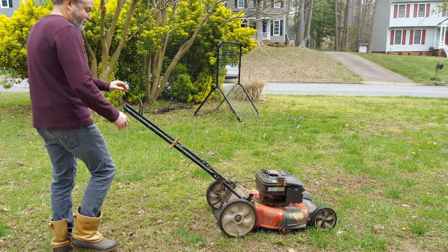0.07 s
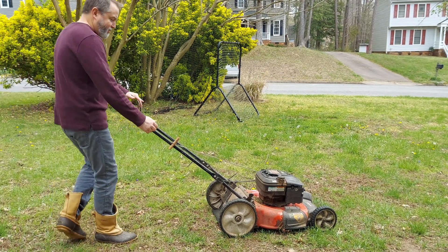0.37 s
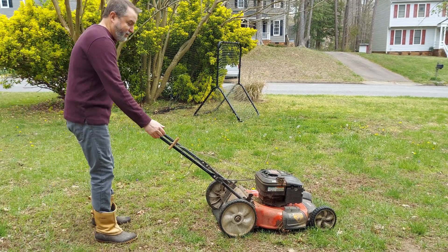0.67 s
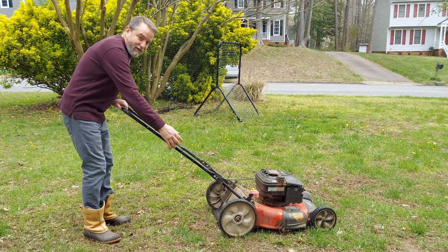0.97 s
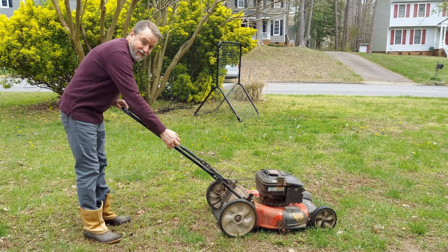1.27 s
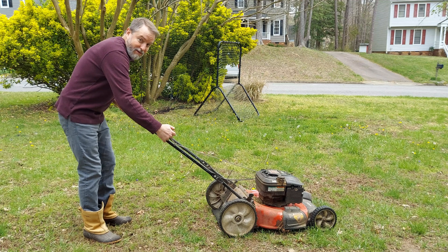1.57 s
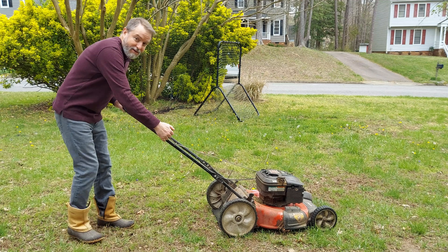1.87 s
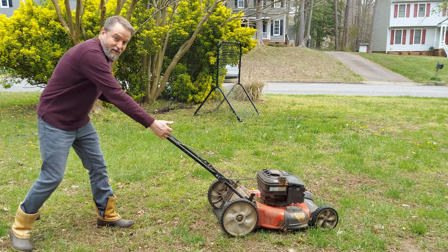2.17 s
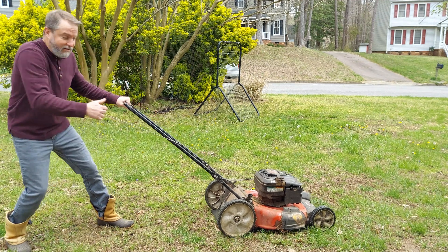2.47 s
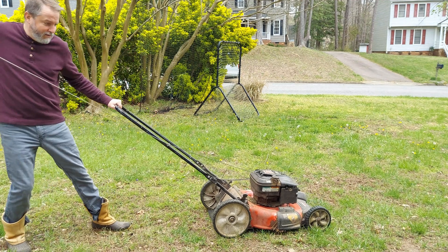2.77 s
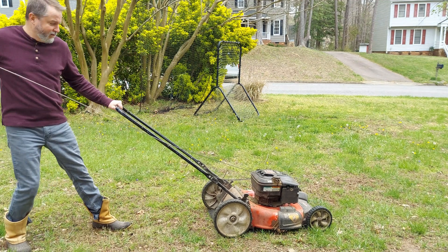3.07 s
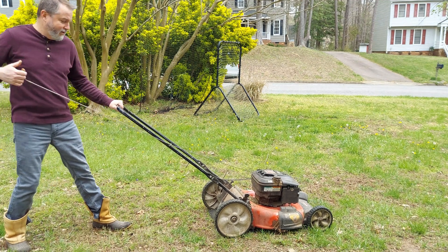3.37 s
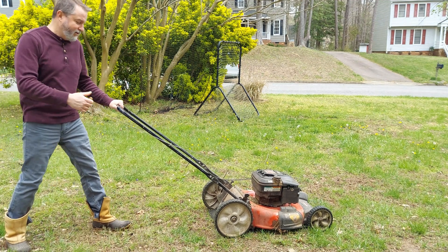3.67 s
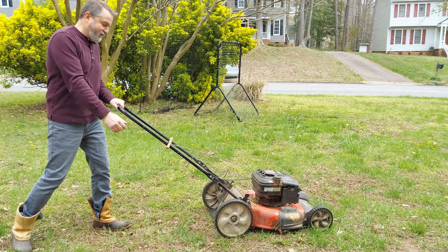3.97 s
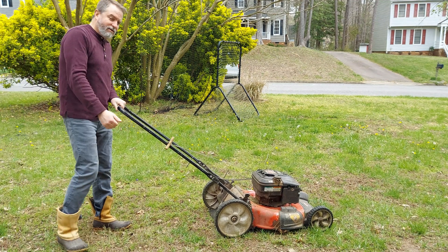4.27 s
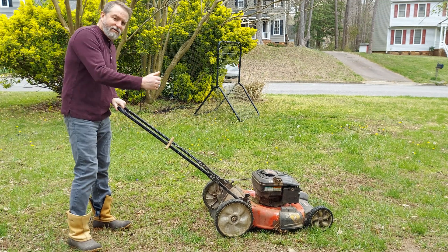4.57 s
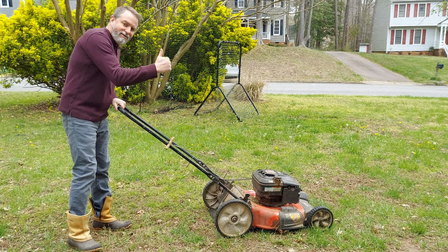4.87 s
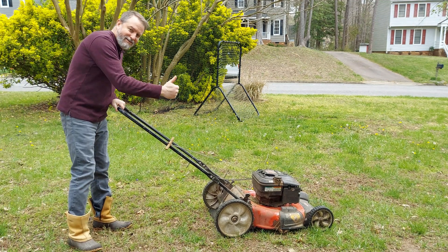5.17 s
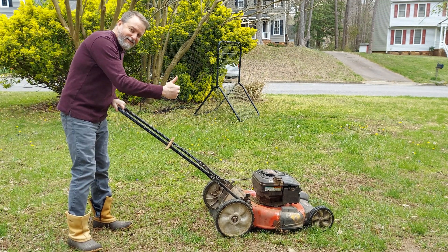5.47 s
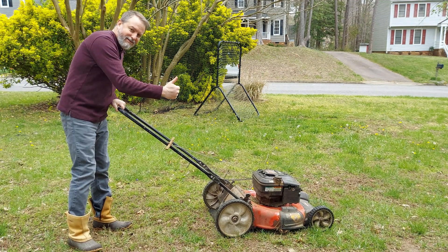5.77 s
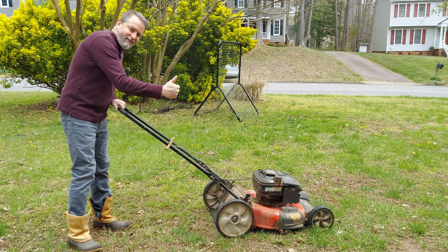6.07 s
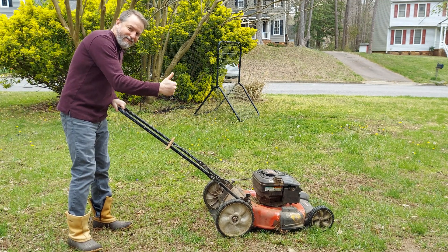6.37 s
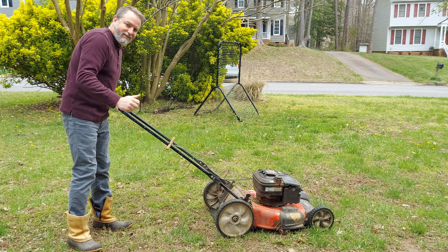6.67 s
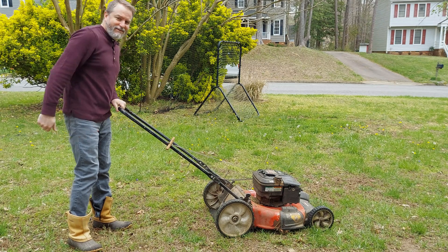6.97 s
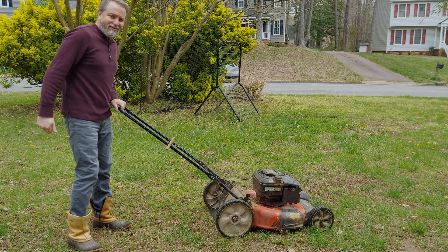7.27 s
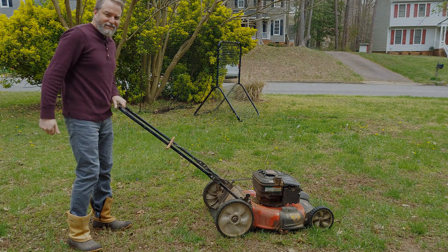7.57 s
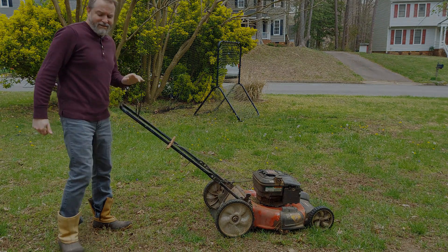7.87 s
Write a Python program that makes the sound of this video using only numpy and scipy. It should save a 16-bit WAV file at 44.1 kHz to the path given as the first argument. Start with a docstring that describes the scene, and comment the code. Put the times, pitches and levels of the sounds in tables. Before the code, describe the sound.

A push mower knocks, starts on one cord pull and runs steadily on a lawn, then is shut off and begins slowing.

```python
"""Push mower on a lawn

A few steps away, the handle is jolted and knocks. One pull on the cord spins the one-cylinder
four-stroke until it fires, and it settles at its governed speed: exhaust pulses ring the muffler,
the blade drones in the deck, piston and valves clatter. Then the ignition is cut and it starts to
coast down. Faint birds and a low neighbourhood rumble sit behind."""
import sys
import numpy as np
from scipy import signal
from scipy.fft import rfft, irfft, next_fast_len
from scipy.io import wavfile
from scipy.ndimage import uniform_filter1d

SR = 44100
rng = np.random.default_rng(int(sys.argv[2]) if len(sys.argv) > 2 else 0)


def digitize_waveform(pressure):
    """Quantize a signal to 16-bit integers and store it at the path in sys.argv[1].

    Rows of a 2-D input are taken as channels; values are limited to [-1, 1].
    """
    field = np.atleast_2d(pressure).T
    bounded = np.clip(field, -1, 1)
    quanta = np.round(bounded * 32767).astype(np.int16)
    wavfile.write(sys.argv[1], SR, quanta)


N = 353285
T = np.arange(N) / SR
RUNNING = (T > 4) & (T < 7.5)  # the steady run, where engine levels are set

# engine speed in four-stroke cycles, two shaft turns each: t/s, f/Hz
SPEED = [(2.45, 0), (2.55, 4.93), (2.82, 5.2), (3.163, 9.06), (3.44, 20.17), (3.663, 25.5), (3.978, 24.24),
         (4.09, 24.3), (4.3, 24.87), (4.45, 24.5), (4.68, 24.74), (4.936, 24.65), (5.096, 24.24),
         (5.356, 24.99), (5.685, 24.11), (5.872, 24.94), (6.119, 24.72), (7.229, 24.93), (7.62, 24.87)]
GOVERNED_HZ, DRAW_HZ, BITE_HZ = 24.8, 7.1, 10  # cruising; intake and blade fade below the other two
CATCH_S, CUT_S, COAST_S = 3.15, 7.63, 0.76  # first firing, ignition cut, coast-down time constant
SHUT_S, SHUT_TAKES_S, REOPEN_TAKES_S = 3.49, .15, 0.87  # throttle shuts near full speed, reopens coasting
# engine faders by part: base level/dB, per doubling of speed/dB, under load/dB, coasting/dB
FADERS = {"exhaust": (-26, 17.5, 11.5, 2.5), "intake": (-23, -0.5, -1.5, -1), "gulp": (-24, 0, -3.5, -5.5),
          "blade": (-18, 5.5, -2, -3), "air": (-22.5, 6, 3, 2), "deck": (-34, 2, 6.5, 3.5),
          "clatter": (-25, 7, 2.5, -3.5), "hiss": (-31.5, 5, 7.5, -2.5)}
# bark of the muffler: f/Hz, level/dB
MUFFLER_EQ = [(20, -80), (75, -20), (120, 12.5), (155, -7.5), (200, -5.5), (270, -11.5), (345, 10.5),
              (420, -7), (700, -14.5), (1200, -16), (4000, -44.5)]
# dull compression thump as the engine coasts down: f/Hz, level/dB
THUMP_EQ = [(20, -19.5), (60, -3), (160, 2.5), (260, -9.5), (550, -8), (900, -14.5), (4000, -42.5)]
# hiss of exhaust gas: f/Hz, level/dB
HISS_EQ = [(1500, 2), (4000, 1.5), (6000, 1.5), (7700, 1.5), (8800, -4), (9900, -8), (11000, -3.5),
           (12000, -0.5), (15500, -3.5)]
# bright rings of the muffler shell: f/Hz, width/Hz, lift/dB
SHELL_PEAKS = [(3400, 900, 10), (7700, 500, 14)]
# air box rung by the intake stroke: f/Hz, level/dB
AIR_BOX_EQ = [(12, -62.5), (40, -18), (72, -31), (98, -3), (124, 7.5), (150, 6.5), (174, 2.5), (222, 4.5),
              (250, -1.5), (272, -13.5), (335, -3.5), (390, -21), (470, -18), (800, -31.5), (3000, -44.5)]
# deep gulp of an open throttle: f/Hz, level/dB
GULP_EQ = [(15, -46), (42, -9), (68, 2.5), (105, -2), (200, -23), (800, -69)]
# one blade pass at governed speed: f/Hz, level/dB
BLADE_EQ = [(30, -44.5), (99, 0), (198, -2), (297, -1.5), (396, -18), (495, -5), (594, -10), (693, -6.5),
            (792, -11.5), (900, -25.5), (1200, -17), (2000, -43.5), (5000, -62)]
# resonances of the discharge chute: f/Hz, width/Hz, lift/dB
CHUTE_PEAKS = [(175, 65, 5.5), (346, 53, 8), (492, 33, 6), (571, 38, 9)]
# air rushing under the deck: f/Hz, level/dB
DECK_AIR_EQ = [(20, -32), (54, -12.5), (90, -11), (130, -9.5), (195, -3), (265, -5), (335, -5), (430, -3),
               (520, -0.5), (640, -14), (830, -13), (1300, -16), (4000, -63)]
# hollow resonances of the deck: f/Hz, width/Hz, lift/dB
DECK_PEAKS = [(206, 50, 4), (338, 110, 4.5), (611.6, 41, -1.5)]
# clatter of piston and valve gear: f/Hz, level/dB
CLATTER_EQ = [(300, -66), (700, 1.5), (850, -4.5), (1100, 0.5), (1300, -1.5), (1600, -4), (1900, -7),
              (2200, -5.5), (2700, -10.5), (3400, -8.5), (4500, -20), (7000, -29.5)]
# ringing panels of the engine shroud: f/Hz, width/Hz, lift/dB
SHROUD_PEAKS = [(1100, 40, 4.5), (1251, 31, 5.5), (1424, 60, 2.5), (1706, 11, 7), (2060, 130, 1),
                (3310, 19, 3.5), (4140, 30, 7.5)]

# knocks of handle, cable and deck: t/s, level/dB, thud/dB, crack/dB, rattle t60/s
KNOCKS = [(0.364, -40.5, -3.5, 3, 0.24), (.711, -31.5, -5, 2, 0.034), (0.728, -34.5, 8, -28, .1),
          (.7555, -22.5, -9, -10, 0.12), (0.792, -21.5, -1.5, -13, 0.12), (0.8124, -9.5, -16, 5, 0.048),
          (0.816, -8.5, -13, -1, 0.042), (0.824, -18.5, 2, 1, 0.12), (.849, -29.5, 11.5, -3, 0.073),
          (1.831, -42.5, -8, -2.5, 0.27), (2.119, -45.5, -17, -6, 0.29), (2.205, -49, -15, 12.5, 0.09),
          (2.363, -30, -4.5, -31, 0.31), (2.624, -18, -8.5, -22, 0.12), (2.674, -18, -2.5, -18, 0.074),
          (2.789, -16, -16, -21, 0.085), (7.622, -15, -13.5, -3, 0.19)]
# kicks to the deck as the engine catches:
# from/s, to/s, place/cycles, first level/dB, slope/(dB/s), thud/dB, crack/dB, rattle t60/s
KICKS = [(3.1, 3.46, .9, -14.5, 4.5, 3, -11, 0.065)]
# modes of the steel frame: f/Hz, level/dB, t60/s
FRAME_MODES = [(171, 2, 0.22), (200, -4, 0.22), (365, -11.5, 0.13), (457, -3.5, 0.09), (586, 0, 0.095),
               (870, -11, 0.1), (1010, -7.5, 0.068), (1575, -12.5, 0.095), (1757, -13, 0.094)]
THUD_BELOW_HZ = 260
# dull rattle of a knock: f/Hz, level/dB
KNOCK_EQ = [(100, -18), (300, -4.5), (550, 3.5), (1000, -4.5), (1350, -14), (1750, -13), (2600, -34),
            (6000, -23.5), (16000, -43.5)]
# bright crack of struck parts: f/Hz, level/dB
CRACK_EQ = [(600, -14), (2000, 1), (4000, 3), (7500, 4), (10000, 1.5), (12500, 4), (16000, 0.5)]

PULL_S, PULL_TAKES_S = 2.414, 0.22  # the cord takes up the weight of the engine
ZIP_S, ZIP_LENGTH_S, ZIP_FIRST_HZ, ZIP_LAST_HZ = 2.43, .25, 563, 2194  # the cord in its guide
ZIP_DB, ZIP_SWELL_DB = -43.5, 19  # level at mid-pull, climb over each half
# starter pawls as the cord runs out and winds back: t/s, level/dB, housing rattle/dB
PAWL_TICKS = [(2.6305, -26, -12), (2.6754, -29, -7), (2.7188, -31.5, -9), (2.763, -29.5, -14),
              (2.8055, -29, 0.5), (2.856, -34, -12), (2.9079, -29, -10), (2.9416, -18, -16),
              (2.9753, -23, -18), (2.9835, -22, -10), (3.047, -26, -9), (3.064, -28.5, 0),
              (3.1005, -16, -17), (3.156, -15, -12.5)]
# the cord's grip seats, the brake lever hits its stop: t/s, level/dB, rattle/dB
STOP_CLICKS = [(3.943, -19, -3), (7.6544, -22.5, -5.5)]
# crisp top of a tick: f/Hz, level/dB
TICK_EQ = [(1500, -10), (9000, -11.5), (11500, 3.5), (16000, 4.5)]
SNAP_T60_S, RATTLE_T60_S, GROAN_LENGTH_S = 0.011, 0.11, 0.035
# rough groans near 600 Hz while the engine is pulled over: t/s, f/Hz, level/dB
GROANS = [(2.554, 570, -25), (2.659, 565, -29), (2.686, 660, -33), (2.752, 567, -39),
          (2.782, 656, -24.5), (2.84, 583, -24), (2.928, 592, -28.5), (2.954, 603, -25.5),
          (2.999, 548, -27), (3.125, 629, -23)]
# the pulley squeaks: t/s, f/Hz, level/dB, length/s
PULLEY_SQUEAKS = [(2.593, 1630, -23.5, 0.006), (2.803, 2470, -33.5, 0.051)]
# pings of the brake lever: t/s, f/Hz, level/dB, t60/s
LEVER_PINGS = [(7.617, 6600, -24, .09), (7.631, 6200, -22, .1)]
# sleeves, boots in the grass, the cord drawn taut: peak t/s, level/dB, rise/s, t60/s
RUSTLE_STROKES = [(.249, -50.5, 0.018, 0.23), (.39, -56.5, 0.035, .6), (.72, -57, .06, 0.8),
                  (.99, -51.5, 0.092, 0.71), (1.70, -54, 0.063, 0.82), (1.94, -54.5, 0.044, 0.67),
                  (2.29, -53.5, 0.043, 1.1), (2.52, -55, 0.11, 0.43)]
# rustle of cloth and grass: f/Hz, level/dB
RUSTLE_EQ = [(300, -6), (1000, -10), (2500, -19.5), (5000, -7), (8000, -6), (10000, -15), (12500, -8.5),
             (16000, -8)]

# distant songbirds: t/s, length/s, first f/Hz, last f/Hz, level/dB
BIRD_CALLS = [(0.484, 0.22, 8340, 7300, -67), (.61, .08, 2150, 1850, -74), (0.916, 0.17, 8600, 7800, -54.5),
              (1.333, 0.065, 2720, 2300, -70), (1.499, 0.56, 3110, 3066, -70.5),
              (2.246, 0.14, 7800, 7600, -59)]
# rumble of the neighbourhood: f/Hz, level/dB
RUMBLE_EQ = [(15, -55.5), (25, -30), (45, -8.5), (74, -17.5), (102, -2.5), (166, -16.5), (300, -23.5),
             (600, -35.5), (1500, -42.5), (4000, -49), (16000, -52)]
# stereo phase, left ahead of right: f/Hz, lead/rad
STEREO_LEAD = [(60, 0.2), (300, -0.09), (580, 1.01), (700, -1.73), (1300, -0.8), (1800, -0.6),
               (3000, -1.76), (4500, -2), (9000, -2.5), (15000, -8)]
# stereo balance, left over right: f/Hz, level/dB
STEREO_BALANCE = [(60, .5), (120, 2), (200, -1.5), (310, 2.5), (580, 2.5), (1290, -1), (2400, -1.4),
                  (4400, -1.5), (8100, 0), (15000, 2)]
# how alike diffuse sound is on both sides: f/Hz, likeness/(0-1)
STEREO_LIKENESS = [(60, 0.95), (200, 0.67), (400, 0.17), (700, 0.2), (1400, 0.72), (3000, 0.54),
                   (8000, 0.31), (15000, 0.16)]


def engine(speed, cycle):
    """Everything is locked to the crank: exhaust, intake a quarter cycle later, four blade passes."""
    wide_open, coasting = 1 - ramp(SHUT_S, SHUT_TAKES_S), ramp(CUT_S, .1)
    firing = wide_open * ramp(CATCH_S, .01)
    load = wide_open * ramp(CATCH_S - 0.08, 0.14)  # the strain builds over the first firings
    throttle = np.clip(wide_open + 0.081 + .5 * ramp(CUT_S, REOPEN_TAKES_S), 0, 1)
    doublings = np.log2(np.maximum(speed, 1) / GOVERNED_HZ)
    level = {part: gain_of(db + speed_db * doublings + load_db * load + coast_db * coasting)
             for part, (db, speed_db, load_db, coast_db) in FADERS.items()}
    # the gas leaves in separate spits while the engine pulls hard
    spit = np.clip(0.27 + 0.73 * firing, 0, 1)
    blowdown = 1 - spit + spit * burst(cycle + 0.0094, rise=0.014, fall=0.32)
    body = exhaust_bark(cycle, level) + intake(speed, cycle, throttle, level) + blade(speed, cycle, level)
    rattle = deck_air(cycle, level) + clatter(cycle, blowdown, level)
    hiss = exhaust_hiss(cycle, firing, blowdown, level)
    body += compression_thump(speed, cycle, coasting)
    rattle += deck_ring(speed, cycle, level)
    # a slow engine chugs: its rattle swings by up to 1 dB each way
    chug_db = np.clip(1 - speed / GOVERNED_HZ, 0, 1) * np.cos(2 * np.pi * (cycle - 0.46))
    return ramp(PULL_S, PULL_TAKES_S) ** 2 * (body + hiss + gain_of(chug_db) * rattle)


def crank():
    """Speed in cycles a second and the count of cycles; after the cut the speed dies away."""
    speed = np.interp(T, *np.transpose(SPEED))
    speed *= np.exp(-np.maximum(T - CUT_S, 0) / COAST_S)
    return speed, np.cumsum(speed) / SR


def exhaust_bark(cycle, level):
    """Each exhaust pulse rings the muffler."""
    bark = ring(-pulses(cycle + 0.023, spread_db=0.5), MUFFLER_EQ)
    return level["exhaust"] * levelled(bark)


def exhaust_hiss(cycle, firing, blowdown, level, snap_db=-23, snap_t60=.06):
    """Gas hisses out, and each hard firing snaps in the muffler's shell."""
    hiss = noise(HISS_EQ, SHROUD_PEAKS) * level["hiss"] * np.sqrt(blowdown)
    firings = firing * pulses(cycle + 0.011, spread_db=2)
    snaps = signal.oaconvolve(firings, gain_of(snap_db - 60 * T[:SR // 4] / snap_t60))[:N]
    return hiss + snaps * noise(CRACK_EQ, SHELL_PEAKS)


def compression_thump(speed, cycle, coasting):
    """A dull compression thump, once a cycle, softening as the engine coasts down."""
    thump = ring(pulses(cycle - .21, spread_db=2.5), THUMP_EQ)
    return gain_of(-5.5) * coasting * speed / GOVERNED_HZ * thump / abs(thump).max()


def intake(speed, cycle, throttle, level):
    """The intake stroke rings the air box; an open throttle adds a deep gulp."""
    stroke, draw = cycle - 1 / 4, np.clip(speed / DRAW_HZ, 0, 1) ** 3
    puff = levelled(ring(pulses(stroke + 0.031, spread_db=0.1), AIR_BOX_EQ))
    gulp = levelled(ring(pulses(stroke + 0.048, spread_db=3.5), GULP_EQ))
    return draw * (level["intake"] * puff + level["gulp"] * throttle * gulp)


def blade(speed, cycle, level):
    """The blade tips drone past the chute, on a shaft slightly out of balance."""
    shake = gain_of(-15.5) * speed / GOVERNED_HZ * np.sin(2 * np.pi * 2 * cycle)
    turbulence = 0.0069 * wander(hz=29.4)  # shifts each pass a little
    passes = ring(pulses(4 * GOVERNED_HZ * T + 0.068 + turbulence, spread_db=0), BLADE_EQ)
    stretched = np.interp(cycle / GOVERNED_HZ, T, passes)  # the whole wave stretches as the blade slows
    drone = levelled(lifted(stretched, CHUTE_PEAKS))
    bite = np.clip(speed / BITE_HZ, 0, 1) ** 3
    return level["blade"] * (shake + bite * drone)


def deck_air(cycle, level):
    """Air rushes through the hollow deck, fluttering with each blade pass."""
    flutter = np.sqrt(.75 + .25 * burst(4 * cycle, rise=.1, fall=.4))
    return noise(DECK_AIR_EQ, DECK_PEAKS) * level["air"] * flutter


def deck_ring(speed, cycle, level, q=10.9):
    """The shaking engine keeps the steel deck humming; a slow blade shakes it pass by pass."""
    shaking, hum = rng.standard_normal(N), np.zeros(N)
    depth = np.clip(.85 * (1.25 - speed / GOVERNED_HZ), 0, 1)
    shaking *= 1 - depth + depth * burst(4 * cycle - 0.056, rise=.05, fall=0.22)
    for hz, _, lift in DECK_PEAKS:
        peak = signal.iirpeak(hz, q, fs=SR)
        hum += gain_of(lift) * signal.lfilter(*peak, signal.lfilter(*peak, shaking))
    return level["deck"] * hum / rms(hum)


def clatter(cycle, blowdown, level):
    """Piston and valve gear slap unevenly each half turn; each exhaust spit shakes the shroud too."""
    slaps = burst(4 * cycle - .2, rise=0.05, fall=0.51) * gain_of(5.34 * wander(hz=60))
    envelope = np.sqrt(1.08 + 0.27 * slaps) * blowdown ** 0.21
    return noise(CLATTER_EQ, SHROUD_PEAKS) * level["clatter"] * envelope


def kicks(cycle):
    """Rows for knocks(): one blow to the deck each cycle as the engine catches."""
    rows = []
    for first, last, place, db, db_per_s, thud_db, crack_db, t60 in KICKS:
        times = T[1:][np.diff(np.floor(cycle - place)) > 0]
        times = times[(times > first) & (times < last)]
        rows += [(s, db + db_per_s * (s - times[0]), thud_db, crack_db, t60) for s in times]
    return rows


def knocks(blows):
    """Each blow rings the steel frame, with a dull rattle and a short bright crack."""
    out = np.zeros((2, N))
    dull, bright = noise(KNOCK_EQ), noise(CRACK_EQ)
    for s, db, thud_db, crack_db, t60 in blows:
        start = round(s * SR)
        t = T[:min(SR // 2, N - start)]
        now = slice(start, start + len(t))
        modes = sum(gain_of(level + (thud_db if hz < THUD_BELOW_HZ else 0) - 60 * t / decay)
                    * np.sin(2 * np.pi * (hz * t + rng.random())) for hz, level, decay in FRAME_MODES)
        rattle = (0.29 * dull[:, now] + 0.34 * gain_of(crack_db) * bright[:, now]) * gain_of(-60 * t / t60)
        attack = 1 - np.exp(-t / 0.0014)
        add(out, s, gain_of(db) * (0.35 * modes + rattle) * attack)
    return out


def starter():
    """The cord zips out, rising in pitch; rough groans sound near 600 Hz, the pulley squeaks, and the pawls
    tick."""
    out, snaps, rattles, t = np.zeros((2, N)), np.zeros(N), np.zeros(N), T[:SR // 4]
    for s, db, rattle_db in PAWL_TICKS + STOP_CLICKS:
        add(snaps, s, gain_of(db - 60 * t / SNAP_T60_S))
        add(rattles, s, gain_of(db + rattle_db - 60 * t / RATTLE_T60_S))
    for s, hz, db, length in [(*groan, GROAN_LENGTH_S) for groan in GROANS] + PULLEY_SQUEAKS:
        add(out, s, gain_of(db) * whirr(length, hz, hz, rough=0.23))
    cord = whirr(ZIP_LENGTH_S, ZIP_FIRST_HZ, ZIP_LAST_HZ, rough=1.6)
    add(out, ZIP_S, cord * gain_of(ZIP_DB + ZIP_SWELL_DB * np.linspace(-1, 1, len(cord))))
    return out + snaps * noise(TICK_EQ) + rattles * noise(CRACK_EQ)


def whirr(length, first_hz, last_hz, rough):
    """A rough, gliding tone of rubbing that swells and fades."""
    size = round(length * SR)
    jitter = uniform_filter1d(rng.standard_normal(size), size=100)
    pitch = np.geomspace(first_hz, last_hz, size) * (1 + rough * jitter)
    return np.hanning(size) * np.sin(2 * np.pi * np.cumsum(pitch) / SR)


def brake_lever():
    """Sprung steel pings as the lever snaps back."""
    out, t = np.zeros(N), T[:SR // 4]
    for s, hz, db, t60 in LEVER_PINGS:
        add(out, s, gain_of(db - 60 * t / t60) * np.sin(2 * np.pi * hz * t))
    return out


def rustle():
    """Each stroke of cloth or grass swells and dies away, in uneven grains."""
    level = sum(gain_of(db - 60 * np.maximum(T - s, 0) / t60) * np.exp(-(np.minimum(T - s, 0) / rise) ** 2)
                for s, db, rise, t60 in RUSTLE_STROKES)
    return noise(RUSTLE_EQ) * level * gain_of(1.5 * wander(hz=120))


def birds():
    """Thin falling whistles with a fast quaver."""
    out, quaver = np.zeros(N), 1 + 0.016 * wander(hz=221)
    for s, length, first_hz, last_hz, db in BIRD_CALLS:
        size = round(length * SR)
        pitch = np.linspace(first_hz, last_hz, size) * quaver[round(s * SR):][:size]
        add(out, s, gain_of(db) * np.hanning(size) * np.sin(2 * np.pi * np.cumsum(pitch) / SR))
    return np.array([out, out])


def garden_tail(x, t60=0.37, dull_hz=5000, echoes_per_s=2000):
    """A thin tail scattered back by shrubs and house fronts."""
    t = T[:SR]
    taps = rng.choice([-1., 1.], (2, SR)) * (rng.random((2, SR)) < echoes_per_s / SR)
    taps *= (t > .015) * gain_of(-60 * t / t60)
    taps = signal.sosfilt(signal.butter(1, dull_hz, fs=SR, output="sos"), taps)
    return signal.fftconvolve(x, taps / np.linalg.norm(taps[0]), axes=1)[:, :N]


def neighbourhood(db=-56.5):
    """A quiet, gently wavering bed of rumble."""
    return noise(RUMBLE_EQ) * gain_of(db + 1.1 * wander(hz=6.7))


def gain_of(db):
    """Decibels to amplitude."""
    return 10 ** (np.asarray(db) / 20)


def rms(x):
    """Root mean square."""
    return np.sqrt(np.mean(x ** 2) + 1e-20)


def levelled(x):
    """Scales x to rms 1 over the steady run."""
    return x / rms(x[RUNNING])


def ramp(start_s, length_s):
    """A straight fade from 0 to 1."""
    return np.clip((T - start_s) / length_s, 0, 1)


def read(points, hz):
    """A spectrum table on a log-frequency axis."""
    f, value = np.transpose(points)
    return np.interp(np.log(hz + 1), np.log(f + 1), value)


def add(mix, s, sound):
    """Mixes a sound in at time s."""
    part = mix[..., round(s * SR):][..., :sound.shape[-1]]
    part += sound[..., :part.shape[-1]]


def wander(hz):
    """Smooth random drift of rms 1, rolled off above hz."""
    x = irfft(rfft(rng.standard_normal(N)) / (1 + (np.fft.rfftfreq(N, 1 / SR) / hz) ** 4), N)
    return x / rms(x)


def pulses(turns, spread_db):
    """One click at each whole turn, its strength scattered by spread_db."""
    at = np.flatnonzero(np.diff(np.floor(turns)) > 0)
    x = np.zeros(N)
    x[at] = gain_of(spread_db * rng.standard_normal(len(at)))
    return x


def burst(turns, rise, fall):
    """An envelope, mean 1 in the steady run, that opens each turn and dies away (times in turns)."""
    phase = turns % 1
    shape = (1 - np.exp(-phase / rise)) * np.exp(-phase / fall)
    return shape / shape[RUNNING].mean()


def ring(x, eq, size=8192):
    """Passes x through a minimum-phase body with the given EQ."""
    log_gain = np.log(gain_of(read(eq, abs(np.fft.fftfreq(size, 1 / SR)))))
    response = np.fft.ifft(np.exp(np.conj(signal.hilbert(log_gain)))).real[:size // 2]
    return signal.oaconvolve(x, response)[:N]


def lifted(x, peaks):
    """Boosts x at the given resonances."""
    return x + sum((gain_of(lift) - 1) * signal.lfilter(*signal.iirpeak(hz, hz / width, fs=SR), x)
                   for hz, width, lift in peaks)


def noise(eq, peaks=()):
    """Coloured stereo noise of rms 1, shaped by any resonances, partly alike left and right."""
    size = next_fast_len(N)
    hz = np.fft.rfftfreq(size, 1 / SR)
    left, other = rfft(rng.standard_normal((2, size)))
    same = np.clip(read(STEREO_LIKENESS, hz), 0, 1)
    right = same * left + np.sqrt(1 - same ** 2) * other
    db = read(eq, hz) + sum(lift / (1 + (2 * (hz - f) / width) ** 2) for f, width, lift in peaks)
    x = irfft(np.array([left, right]) * gain_of(db), size)[:, :N]
    return x / rms(x)


def stereo(x):
    """Direct sound reaches left and right with a small offset in delay and level."""
    size = next_fast_len(N)
    hz = np.fft.rfftfreq(size, 1 / SR)
    half = gain_of(read(STEREO_BALANCE, hz) / 2) * np.exp(.5j * read(STEREO_LEAD, hz))
    return irfft(rfft(x, size) * np.array([half, 1 / half]), size)[:, :N]


def scene():
    """The mower and its handler up front, birds and neighbourhood behind."""
    speed, cycle = crank()
    mower = stereo(engine(speed, cycle) + knocks(KNOCKS + kicks(cycle)) + starter()
                   + brake_lever() + rustle())
    rumble, song = neighbourhood(), birds()
    return mower + song + garden_tail(gain_of(-21) * mower + gain_of(-0.5) * song) + rumble


def record(dry, edge_hz=15950):
    """A steep low-pass trims the very top."""
    lowpass = signal.firwin(511, edge_hz, window=("kaiser", 9), fs=SR)
    return signal.oaconvolve(dry, lowpass[None], "same")


dry = scene()
out = record(dry)
digitize_waveform(out)
```